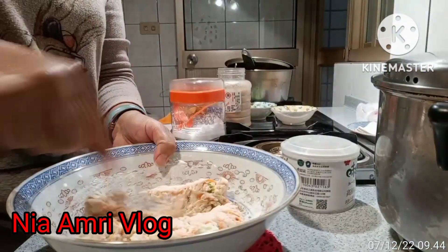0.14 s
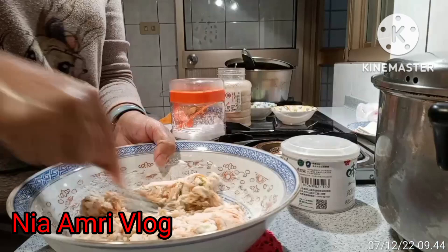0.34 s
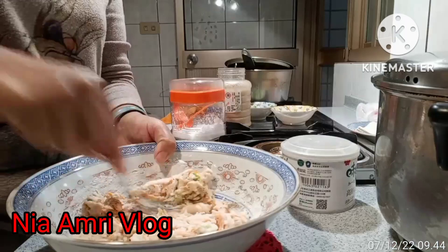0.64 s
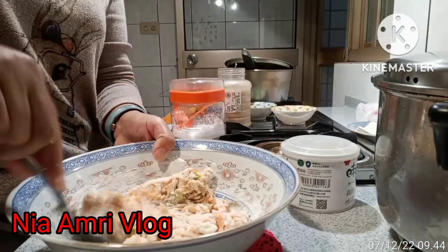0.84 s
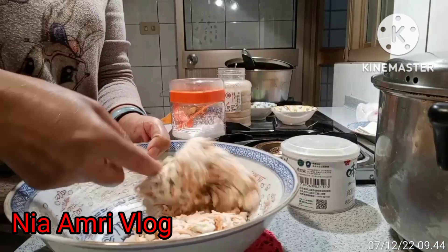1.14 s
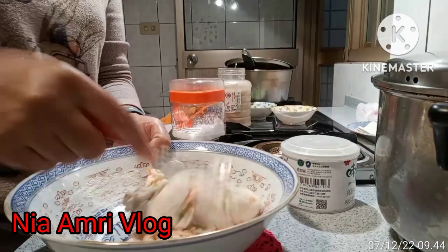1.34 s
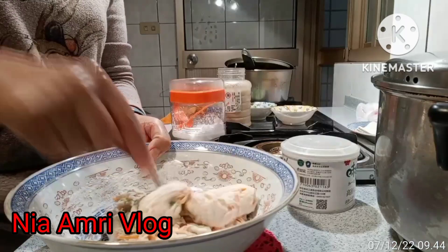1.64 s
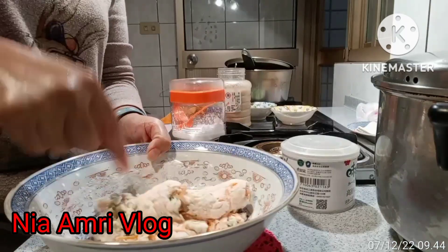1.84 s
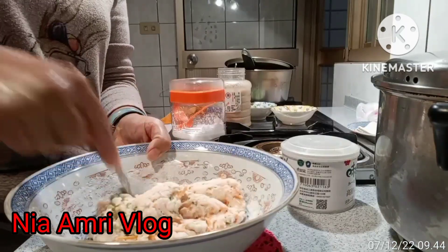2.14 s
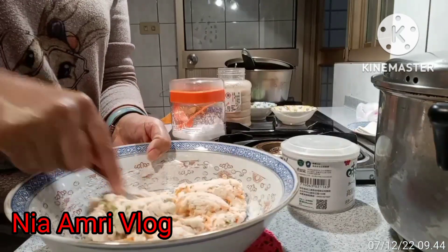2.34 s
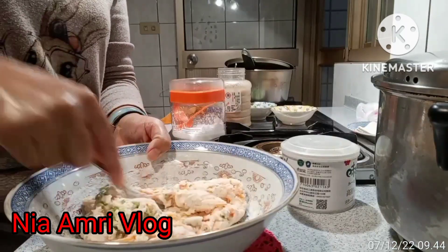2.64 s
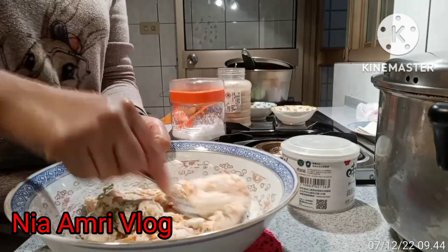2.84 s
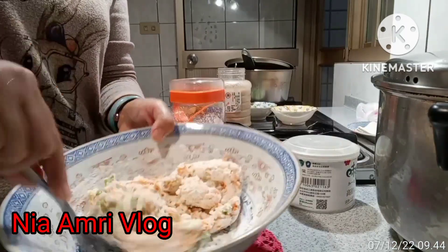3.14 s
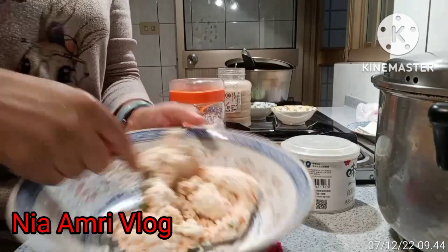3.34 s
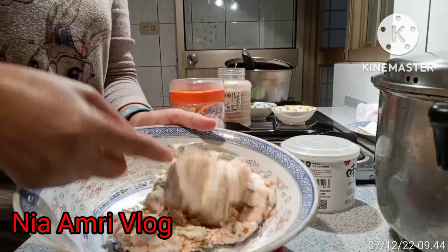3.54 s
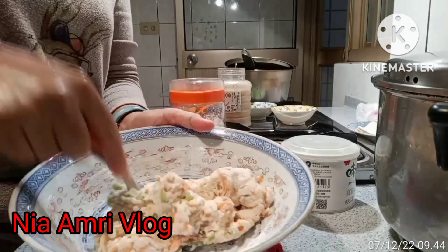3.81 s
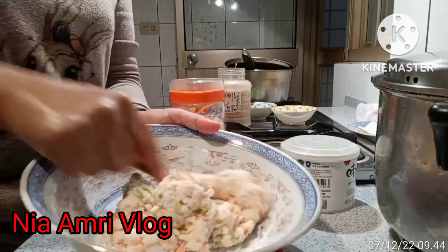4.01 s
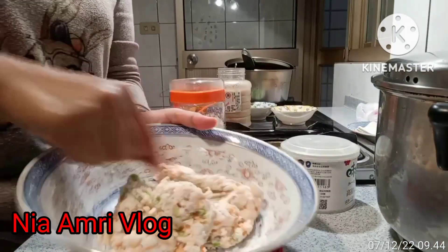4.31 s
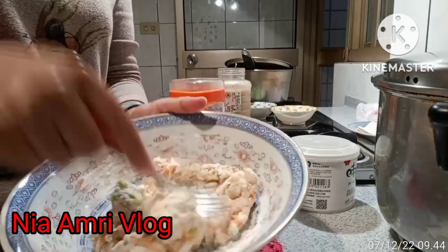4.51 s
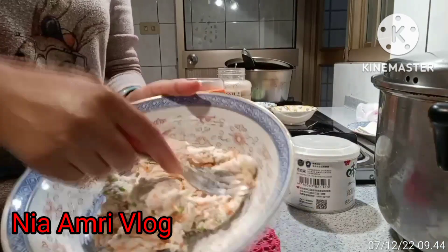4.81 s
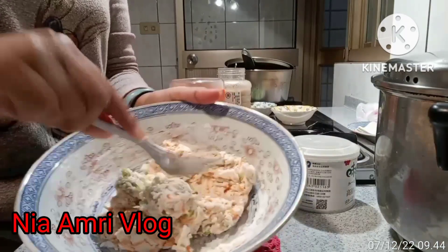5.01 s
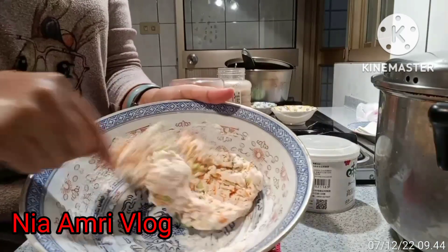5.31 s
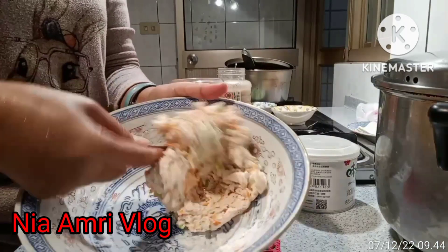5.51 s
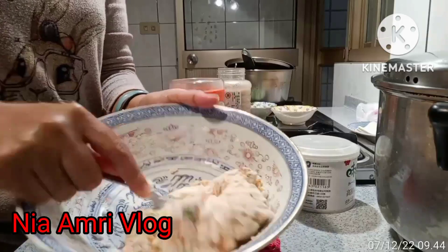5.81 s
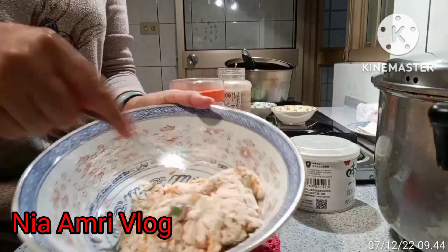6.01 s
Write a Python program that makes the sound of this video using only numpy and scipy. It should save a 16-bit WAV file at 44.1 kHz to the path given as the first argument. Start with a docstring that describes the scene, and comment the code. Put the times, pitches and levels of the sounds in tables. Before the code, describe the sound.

Close up in a tiled home kitchen, a metal fork works thick wet dough in a porcelain bowl. Early on the tines hit the bare wall with a bright clink that rings briefly, scrapes, and is stopped by a hand. Soft squelches and tiny snaps follow, with two later clusters of dull knocks, bright ticks and gritty scraping. Low rumble, hum and a faint high whine stay underneath.

```python
"""Fork folding dough in a porcelain bowl

A metal fork strikes the bare bowl wall once: dying sines ring until a hand on the rim stills them.
Later strokes are short damped modes (knocks), bright resonant ticks and dense grains (scrapes on the glaze).
Presses of the fork squelch as filtered crackle, with snapping air pockets, soft thumps and wet squeaks.
Beneath lie the rub and rumble of the bowl on its mat and filtered room noise with a hum and a high whine.
"""
import sys
import numpy as np
from scipy import signal
from scipy.fft import rfft, irfft
from scipy.io import wavfile
from scipy.ndimage import uniform_filter1d

SR = 44100
rng = np.random.default_rng(int(sys.argv[2]) if len(sys.argv) > 2 else 0)


def generate_wav(signal):
    """Clip the signal to [-1, 1] and save it as 16-bit WAV at the path in sys.argv[1]."""
    frames = np.transpose(np.atleast_2d(signal))
    scaled = np.clip(frames, -1, 1) * 32767
    pcm = np.round(scaled).astype(np.int16)
    wavfile.write(sys.argv[1], SR, pcm)


N = 271567
TIME = np.arange(N) / SR
RING = TIME[:SR]  # one second, the longest any single event lasts
GRIP_S = 0.934  # the hand closes on the rim and stills the ring

# modes of the free bowl with the fork against it: f/Hz, relative level/dB, t60 before the grip/s
FREE_BOWL = [(727, -15.5, .15), (926, -33, .16), (1248, -28, .14), (1291, -16, .45), (1414, -32, .24),
             (1530, -28, .08), (1979, -24, .14), (2036, -23, .3), (2105, -33, .2), (2715, -37, .1),
             (2982, -13.5, .33), (3490, -32, .08), (4050, -22, .07), (4112, -23.5, .4), (4185, -29, .38),
             (4800, -34, .07), (5324, -29, .13), (5365, -26, .26), (6650, -34, .08), (7735, -29, .17),
             (8250, -26, .08), (8380, -29, .13), (8768, -23, .21), (9050, -33, .15), (9138, -34, .26),
             (10330, -31, .07), (11340, -34, .13), (12600, -23.5, .06), (12730, -30, .15),
             (14350, -29, .06)]
# air pockets popping in the dough and tearing it open: t/s, snap peak/dB, crackle level/dB
AIR_POCKETS = [(0.424, -46, -63), (1.427, -48, -60), (1.539, -60, -50.5), (1.56, -66, -59),
               (1.6322, -43, -77), (1.705, -39, -70), (1.733, -58, -61), (1.85, -42.5, -57),
               (1.884, -45, -77), (2.249, -53.5, -57), (2.682, -46, -62), (3.289, -42.5, -58),
               (3.554, -37, -52.5), (3.8146, -52.5, -62), (3.9873, -47, -60), (4.162, -54.5, -65.5),
               (4.331, -55, -69), (4.445, -53.5, -62), (4.654, -56, -65), (5.2951, -52, -60.5),
               (5.664, -60, -58)]


def amp(db):
    """Decibels to gain."""
    return 10 ** (np.asarray(db) / 20)


def evened(x):
    """Scales to rms 1."""
    return x / np.sqrt(np.mean(x ** 2) + 1e-20)


def read(points, hz):
    """Reads a table on a log-frequency axis."""
    f, value = np.transpose(points)
    return np.interp(np.log(hz + 1), np.log(f + 1), value)


def curves(rows):
    """Each column of a table after the first as a curve over the whole time."""
    s, *columns = np.transpose(rows)
    return [np.interp(TIME, s, c) for c in columns]


def add(mix, s, sound):
    """Mixes a sound in at time s."""
    part = mix[round(s * SR):][:len(sound)]
    part += sound[:len(part)]


def colour(x, spectrum, size=4096):
    """Minimum-phase filter of unit energy, shaped by the given spectrum."""
    level_db = read(spectrum, np.fft.rfftfreq(size, 1 / SR))
    cepstrum = irfft(np.log(amp(level_db)))
    # folding the cepstrum forward makes the filter causal
    cepstrum[1:size // 2] *= 2
    cepstrum[size // 2 + 1:] = 0
    taps = irfft(np.exp(rfft(cepstrum)))
    return signal.oaconvolve(x, taps / np.linalg.norm(taps))[:len(x)]


def resonate(x, hz, width_hz):
    """One two-pole resonance; a narrower width rings longer."""
    r = np.exp(-np.pi * width_hz / SR)
    return signal.lfilter([1, 0, -1], [1, -2 * r * np.cos(2 * np.pi * hz / SR), r * r], x)


def grains(per_s, spread_db, hiss):
    """Tiny clicks of very unequal size over a smooth hiss."""
    size = amp(spread_db * np.minimum(rng.exponential(1, N), np.pi)) * rng.choice([-1, 1], N)
    clicks = evened(size * (rng.random(N) < per_s / SR))
    return evened(clicks + hiss * rng.standard_normal(N))


def waver(per_s, depth_db):
    """A gain that drifts at random."""
    knots = rng.standard_normal(N)
    return amp(depth_db * np.interp(TIME * per_s, np.arange(N), knots))


def ring(modes):
    """Dying sines, each starting from rest in either direction."""
    out = 0
    for hz, db, t60 in modes:
        decay = np.exp(-np.log(1000) * RING / t60)
        out = out + rng.choice([-1, 1]) * amp(db) * decay * np.sin(2 * np.pi * hz * RING)
    return out


def burst(decay_s):
    """A puff of noise that decays exponentially."""
    return rng.standard_normal(len(RING)) * np.exp(-RING / decay_s)


def glide(hz, width_hz):
    """A fuzzy tone of rms 1: slow complex noise carried along the pitch curve hz."""
    r = np.exp(-np.pi * width_hz / SR)
    noise = rng.standard_normal(SR) + 1j * rng.standard_normal(SR)
    jitter = signal.lfilter([1], [1, -2 * r, r * r], noise)[-len(hz):]
    return evened((jitter * np.exp(2j * np.pi * np.cumsum(hz) / SR)).real)


def clink(room, rise_s=.0009, crack_s=0.0013, ring_db=-1.0, blur_db=-6.0, crack_room_db=-4, grip_db_per_s=130):
    """The tines land one after another and pump up the ring of the bowl."""
    # tines chattering as they land: t/s, level before colouring/dB
    landings = [(0.6606, -21.5), (.6618, -16.5), (.6630, -14), (0.6637, -22), (0.6645, -17.5)]
    # colour of the cracks: f/Hz, relative level per Hz/dB
    crack_colour = [(30, -38.5), (120, -14), (280, -9), (450, -13), (900, 0.5), (1500, -0.5), (4000, 0),
                    (6500, -15), (9000, -4), (12500, -6), (14000, -10.5), (16000, -12)]
    strike_s = .6608
    tones, cracks = np.zeros(N), np.zeros(N)
    for mode in FREE_BOWL:
        tone = ring([mode]) * (1 - np.exp(-RING / rise_s))
        echo = signal.fftconvolve(tone, room)[:SR]
        # echoes make the mode beat and linger but leave its strength alone
        echo -= tone * (echo @ tone) / (tone @ tone)
        add(tones, strike_s, tone + amp(blur_db) * evened(echo) * tone.std())
    tones *= amp(ring_db - grip_db_per_s * np.maximum(TIME - GRIP_S, 0))
    for s, db in landings:
        add(cracks, s, amp(db) * burst(crack_s))
    cracks = colour(cracks, crack_colour)
    return tones + cracks + amp(crack_room_db) * signal.oaconvolve(cracks, room)[:N]


def rubbed_ring(drag, ring_db=-5, grip_db_per_s=130):
    """While the bowl is still free, the dragging fork keeps its modes alive, the high ones most."""
    modes = ring(FREE_BOWL)
    push = np.gradient(drag)  # the slope favours high tones
    rung = signal.oaconvolve(push, modes / np.linalg.norm(modes))[:N]
    return rung * amp(ring_db - grip_db_per_s * np.maximum(TIME - GRIP_S, 0))


def scrapes(glaze_db=-1.0, tines_db=-8, pivot_hz=6500):
    """Dense stick and slip of steel on glaze; the fork's resonances come and go as the contact point moves."""
    # drags of the fork, one list a stroke: t/s, level/dB, roll towards lower tones/dB per octave
    drags = [
        [(.69, -41.5, 4.5), (.75, -42.5, 9), (.775, -41.5, 6.5), (.80, -37, 4.5), (.83, -40, 1),
         (.86, -49, 16.5), (.92, -52, 3), (.98, -84, 3)],
        [(2.972, -61, -13), (2.985, -49.5, -8), (3.04, -47, 2), (3.075, -43.5, -4), (3.11, -47.5, -8),
         (3.16, -49.5, 8), (3.195, -61, 2)],
        [(4.98, -58, -12), (5.02, -49.5, 2), (5.065, -52.5, -3), (5.095, -47.5, 21), (5.12, -52, -9),
         (5.145, -49, 8), (5.185, -50, 8), (5.23, -59, 13)],
    ]
    # colour of the slips on the glaze: f/Hz, relative level per Hz/dB
    glaze_colour = [(30, -23.5), (100, 4), (260, 2.5), (500, -2.5), (1100, -3), (2000, -5), (3600, -2.5),
                    (6300, -7.5), (8000, 0.5), (12000, -9), (14800, -5.5), (16000, -17)]
    # the fork sings as it drags: f/Hz, width/Hz, relative level/dB
    fork_modes = [(3622, 530, -4.5), (4400, 300, -6), (5094, 700, -2.5), (7050, 200, -6), (8380, 340, 0.5),
                  (9400, 1200, -2), (13050, 450, -9.5), (14900, 500, -10.5)]
    slips = grains(per_s=2000, spread_db=4.3, hiss=.65) * waver(per_s=120, depth_db=1.7)
    strokes = np.zeros(N)
    for stroke in drags:
        s, db, _ = np.transpose(stroke)
        strokes += np.interp(TIME, s, amp(db), left=0, right=0)
    _, roll_db = curves(np.vstack(drags))
    out = amp(glaze_db) * colour(slips, glaze_colour)
    for hz, width_hz, db in fork_modes:
        tilt = amp(-roll_db * np.log2(hz / pivot_hz))  # positive roll favours the lower modes
        kicks = slips * rng.choice([-1, 1], N)  # each slip pushes a mode either way
        song = evened(resonate(resonate(kicks, hz, width_hz), hz, 2 * width_hz))
        out += amp(db + tines_db) * tilt * song * evened(waver(per_s=70, depth_db=5))
    return strokes * out


def knocks(soft_s=0.0042, cushion_s=0.00036, tick_db=-10, thump_width_hz=80):
    """Damped blows on the held bowl and loose low thumps."""
    # the held bowl, damped by dough: f/Hz, relative level/dB, t60/s
    held_bowl = [(170, -18.5, 0.031), (350, -15.5, 0.25), (586, 14, 0.0038), (685, -2.5, 0.026),
                 (833, 2.5, 0.027), (1139, 3.5, 0.032), (1366, -13.5, 0.022), (2810, -9.5, 0.017)]
    # dull knocks of the fork through the dough: t/s, gain on the modes/dB
    blows = [(1.544, -57), (2.247, -65), (2.974, -53), (3.005, -48.5), (3.071, -55), (4.135, -61),
             (4.98, -35.5)]
    # lumps of dough land and the bowl rocks on its mat: t/s, level/dB, f/Hz, t60/s
    lumps = [(0.661, -41.5, 301, 0.22), (0.924, -43.5, 170, 0.084), (1.901, -52.5, 126, 0.13),
             (2.985, -53.5, 170, 0.41), (3.198, -45.5, 237, 0.12), (3.216, -49, 234, 0.17),
             (3.259, -41, 125, 0.048), (3.92, -60.5, 149.3, 0.4), (4.14, -57, 339.6, 0.21),
             (4.168, -60, 112.4, .3), (4.235, -58.5, 260.5, 0.15), (4.982, -52.5, 106.4, 1)]
    out = np.zeros(N)
    for s, db in blows:
        blow = ring(held_bowl) + amp(tick_db) * burst(decay_s=0.00089)
        add(out, s, amp(db) * (1 - np.exp(-RING / cushion_s)) * blow)
    # a small bowl radiates no deep bass
    out = signal.sosfilt(signal.butter(2, 110, "highpass", fs=SR, output="sos"), out)
    for s, db, hz, t60 in lumps:
        envelope = (1 - np.exp(-RING / soft_s)) * np.exp(-np.log(1000) * RING / t60)
        thump = envelope * glide(np.full(SR, hz), thump_width_hz)
        add(out, s, amp(db) * envelope.std() * evened(thump))
    return out


def catches(width_hz=2000, snap=0.088):
    """A tine sticks and lets go with a short, bright tick."""
    # tines catching on the glaze: t/s, peak/dB, centre f/Hz
    snags = [(.75, -43, 14000), (.929, -32, 9660), (1.03, -42, 9025), (1.848, -48, 6300),
             (2.957, -43, 10940), (2.982, -28.5, 8050), (3.004, -31, 7100), (3.0516, -34, 4560),
             (3.072, -31.5, 3540), (3.087, -34, 10100), (3.1118, -30, 7950), (4.9801, -33.5, 9530),
             (5.09, -26.5, 4020), (5.0903, -30.5, 9800), (5.164, -35, 5370), (5.18, -27, 4570),
             (5.209, -36, 4400), (5.22, -36, 4170)]
    out = np.zeros(N)
    for s, db, hz in snags:
        slip = (RING == 0) + 0.12 * burst(decay_s=.0011)
        body = evened(resonate(resonate(slip, hz, width_hz), hz, 3 * width_hz))
        tick = body + snap * evened(slip)
        add(out, s, amp(db) * tick / abs(tick).max())
    return out


def squeaks(width_hz=300):
    """Brief sliding notes of wet dough on glaze."""
    # dough slipping with a soft squeak: t/s, length/s, level before fading/dB, start f/Hz, end f/Hz
    slides = [(1.534, 0.061, -65, 1900, 1676), (2.084, 0.062, -67, 3900, 3660),
              (2.236, .025, -62, 1983, 1930), (3.085, 0.025, -59, 955, 780),
              (5.308, 0.05, -62.5, 2040, 1980), (5.641, .17, -70, 2570, 2050)]
    out = np.zeros(N)
    for s, length_s, db, start_hz, end_hz in slides:
        hz = np.linspace(start_hz, end_hz, round(length_s * SR))
        add(out, s, amp(db) * glide(hz, width_hz) * np.hanning(len(hz)))
    return out


def pops(hz=11000, width_hz=7000):
    """Small air pockets burst in the dough, each with one sharp snap."""
    out = np.zeros(N)
    for s, db, _ in AIR_POCKETS:
        pop = resonate((RING == 0) + 1.2 * burst(decay_s=.0009), hz, width_hz)
        add(out, s, amp(db) * pop / abs(pop).max())
    return out


def effort(rise_s=0.014, release_s=0.019):
    """How hard the dough is worked: each press builds up, holds and lets go."""
    # the fork presses through the dough: start t/s, length before release/s, squelch level/dB
    presses = [(0, 0.0073, -60), (0.072, .12, -66.5), (0.355, 0.13, -69.5), (0.938, 0.12, -62.5),
               (1.08, 0.044, -69.5), (1.222, 0.25, -64.5), (1.513, 0.16, -63), (1.69, .055, -64),
               (1.819, 0.12, -64), (1.963, 0.059, -71), (2.081, 0.082, -65), (2.17, .11, -68.5),
               (2.376, 0.092, -65), (2.525, 0.17, -71), (2.681, 0.077, -65), (2.839, .015, -71),
               (2.927, 0.044, -67.5), (3.216, 0.23, -65.5), (3.464, 0.24, -62), (3.8, 0.15, -68),
               (4.128, 0.086, -69.5), (4.288, .09, -78.5), (4.39, 0.111, -68.5), (4.683, 0.085, -65.5),
               (5.261, 0.1, -64.5), (5.397, 0.21, -63.5), (5.627, 0.17, -64.5), (5.918, 0.11, -68),
               (6.027, .08, -76.5)]
    power = np.zeros(N)
    for s, length_s, db in presses:
        release = np.exp(-np.maximum(RING - length_s, 0) / release_s)
        shape = np.minimum(RING / rise_s, 1) * release
        add(power, s, (amp(db) * shape) ** 2)
    return np.sqrt(power)


def dough(work, tear_s=.02):
    """Wet strands part in a fine crackle as the fork presses through, and in a short spray after each pop."""
    # colour of the crackle: f/Hz, relative level per Hz/dB
    squelch_colour = [(500, -14), (2000, -4), (4000, -1.5), (5500, -5), (7700, -5.5), (9200, 6),
                      (10500, -2.5), (12500, -2), (15300, -5), (16000, -9.5)]
    tears = np.zeros(N)
    for s, _, db in AIR_POCKETS:
        add(tears, s, amp(db) * np.exp(-RING / tear_s))
    crackle = grains(per_s=800, spread_db=5.2, hiss=1.4) * waver(per_s=90, depth_db=1.7)
    return np.hypot(work, tears) * colour(crackle, squelch_colour)


def swell(smooth_s=.1):
    """The jumps and slow slides, in dB, of the rub, rumble and whine: the background swells at a few moments
    and sinks slowly."""
    # the background swells: t/s, level/dB, sinking/dB per s
    rises = [(0, 0.5, -1.5), (.8, 11, 7.5), (3.1, 7.5, 7.5), (5.1, 3, 8.5)]
    level_db = np.zeros(N)
    for s, db, sink_db_per_s in rises:
        level_db = np.where(TIME >= s, db - sink_db_per_s * (TIME - s), level_db)
    return uniform_filter1d(level_db, round(smooth_s * SR))


def handling(work, swell_db, rub_db=-70, rumble_db=-71.0, rumble_follow=0.67, resting=0.78, full_press_db=-68):
    """The bowl rubs and rumbles on its mat, more while the fork bears down."""
    # colours of the rub and the rumble: f/Hz, relative level per Hz/dB
    rub_colour = [(200, -14), (400, -1.5), (700, 0), (1200, -0.5), (1900, -2), (2600, -6.5), (3600, -8),
                  (4500, -14), (7000, -35.5), (16000, -47.5)]
    rumble_colour = [(25, -32), (50, -8), (80, 0.5), (180, 0), (280, -3.5), (400, -7), (800, -31)]
    load = resting + (1 - resting) * np.tanh(work / amp(full_press_db))
    rub = colour(grains(per_s=2100, spread_db=3, hiss=0.78), rub_colour)
    rumble = colour(rng.standard_normal(N), rumble_colour) * waver(per_s=25, depth_db=3.5)
    rub_gain = amp(rub_db + swell_db)
    rumble_gain = amp(rumble_db + rumble_follow * swell_db)
    return load * (rub_gain * rub + rumble_gain * rumble)


def background(swell_db, whine_follow=0.98, air_db=-71.5):
    """Soft filtered room noise with a low hum, a faint middle tone and a fuzzy high whine from resonated noise."""
    # hum, middle tone and whine: f/Hz, width/Hz, level before the slow changes/dB
    drone_tones = [(63, 5, -74), (604, 4.1, -84.5), (3516, 62, -76)]
    # slow level changes of the hum: t/s, gain/dB
    hum_moves = [(0, 12.5), (.55, -21), (.85, 12), (1.5, -0.5), (2.4, -23), (3.1, -2), (3.8, -22),
                 (4.25, -3.5), (6.1, -9.5)]
    # colour of the room noise: f/Hz, relative level per Hz/dB
    air_colour = [(25, -19), (45, 1.5), (70, 5.5), (110, 9), (200, 4), (400, -1.5), (600, 0.5), (1200, -4),
                  (1900, -2), (2800, -5.5), (3800, -6.5), (5500, -16), (9000, -23.5), (16000, -29)]
    tones = []
    for hz, width_hz, db in drone_tones:
        tone = resonate(resonate(rng.standard_normal(N), hz, width_hz), hz, width_hz * 2)
        tones.append(amp(db) * evened(tone))
    hum, middle, whine = tones
    hum_db, = curves(hum_moves)
    upper = (middle + amp(whine_follow * swell_db) * whine) * waver(per_s=4.7, depth_db=1.0)
    air = amp(air_db) * colour(rng.standard_normal(N), air_colour)
    return amp(hum_db) * hum + upper + air


def kitchen(first_s=.004):
    """The room's answer to a click: dense echoes off tiles, each band dying at its own speed."""
    # decay of the room: f/Hz, t60/s
    room_decay = [(100, 0.16), (500, 0.6), (2000, 0.75), (4000, 0.53), (9000, 0.25), (16000, 1)]
    taps = rng.standard_normal(SR) * (rng.random(SR) < 4000 / SR) * (RING > first_s)
    hz, t, bands = signal.stft(taps, SR, nperseg=256)
    decay = np.exp(-np.log(1000) * t / read(room_decay, hz)[:, None])
    tail = signal.istft(bands * decay, SR, nperseg=256)[1][:SR]
    return tail / np.linalg.norm(tail)


def scene(echoes_db=-8.0):
    """Hard contacts, pops and squeaks carry into the room; the other soft sounds stay close."""
    room, work, swell_db, drag = kitchen(), effort(), swell(), scrapes()
    contacts = knocks() + catches() + pops() + drag + squeaks()
    echoes = amp(echoes_db) * signal.oaconvolve(contacts, room)[:N]
    bowl = clink(room) + rubbed_ring(drag) + contacts + echoes
    soft = dough(work) + handling(work, swell_db) + background(swell_db)
    return (bowl + soft)[None]


def record(dry, edge_hz=15560):
    """The recorder's band limit: a steep low-pass that takes off the top treble."""
    taps = signal.firwin(511, edge_hz, window=("kaiser", 9), fs=SR)
    return signal.oaconvolve(dry, taps[None], "same")


dry = scene()
out = record(dry)
generate_wav(out)
```